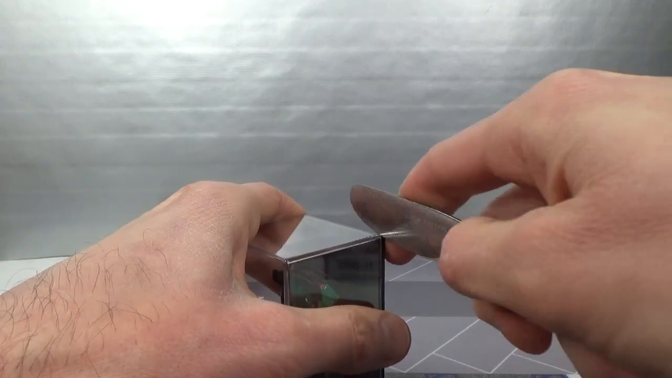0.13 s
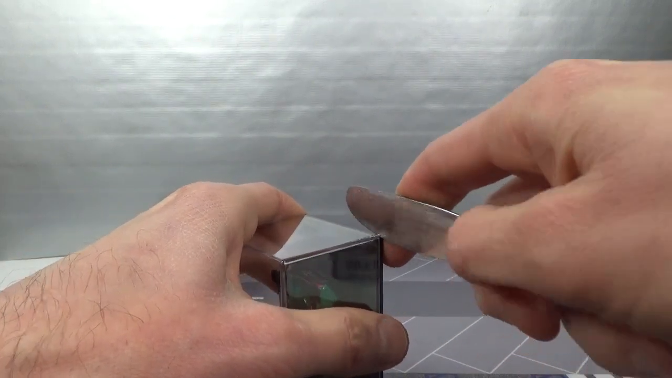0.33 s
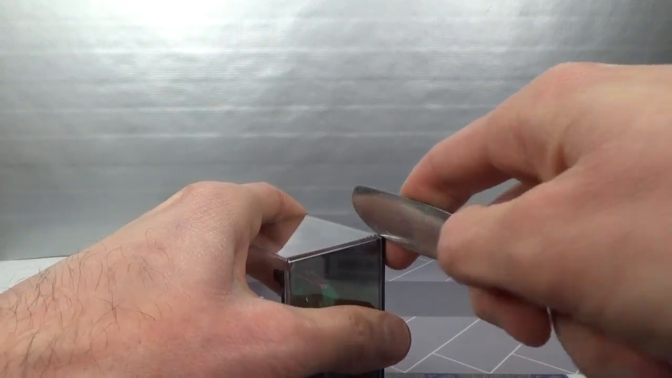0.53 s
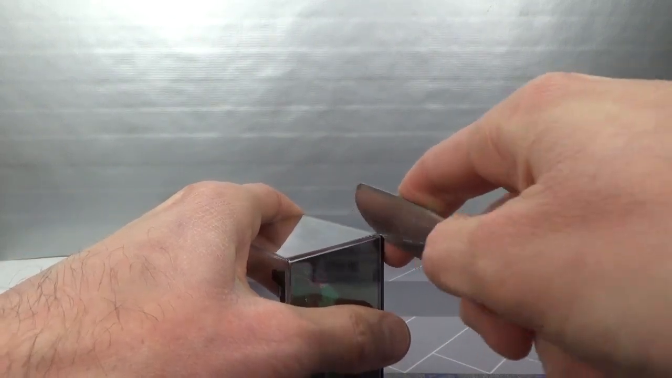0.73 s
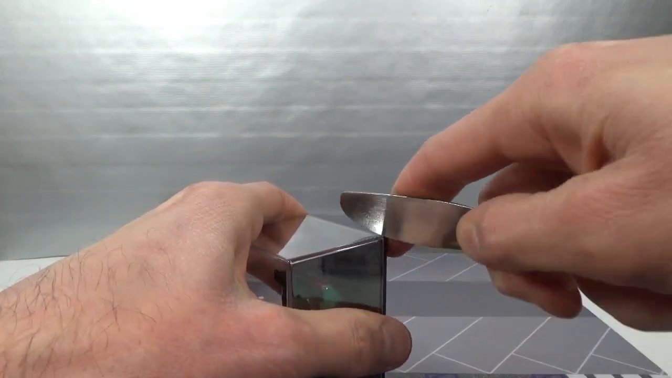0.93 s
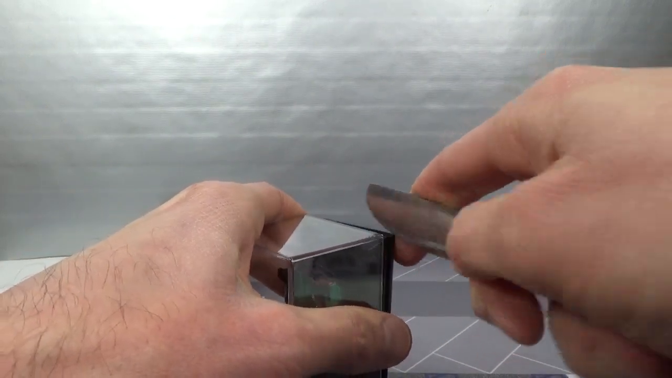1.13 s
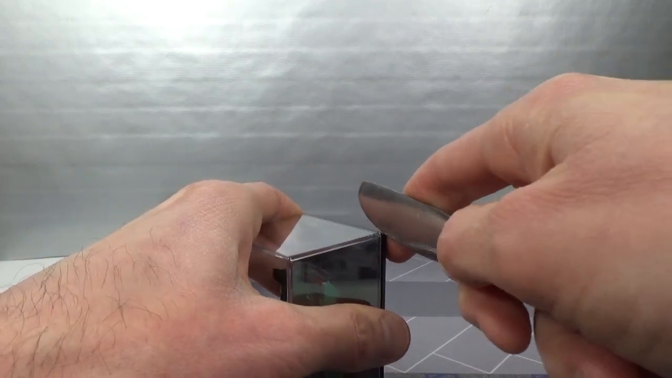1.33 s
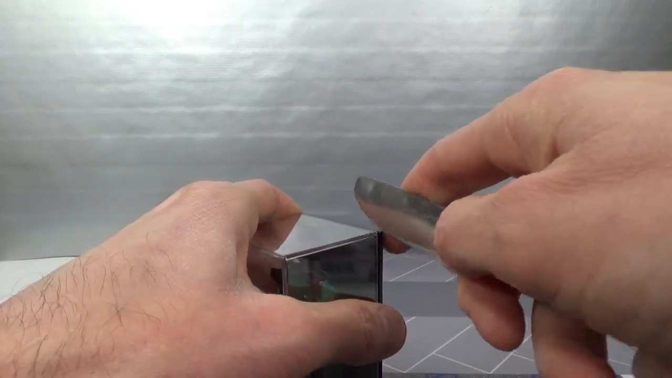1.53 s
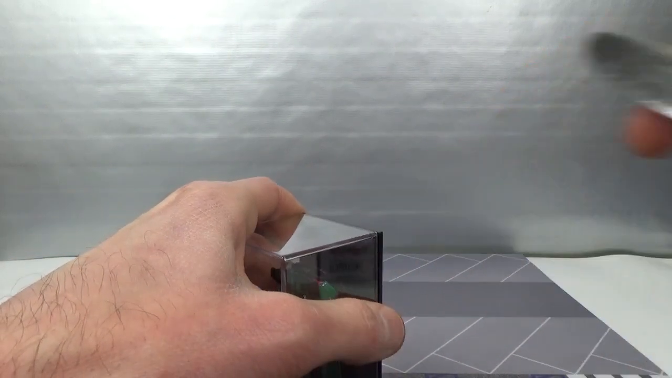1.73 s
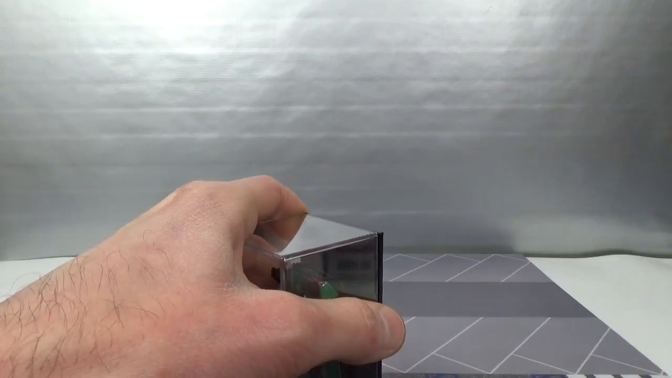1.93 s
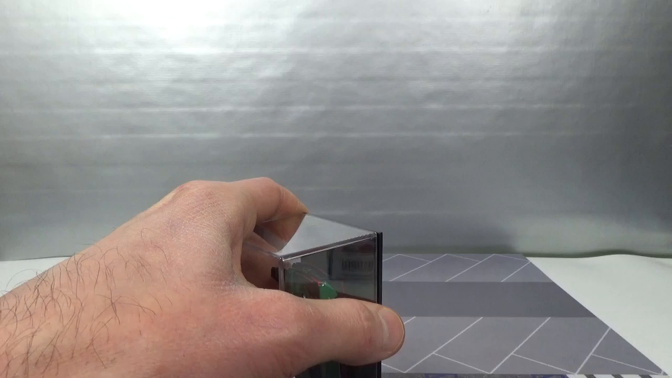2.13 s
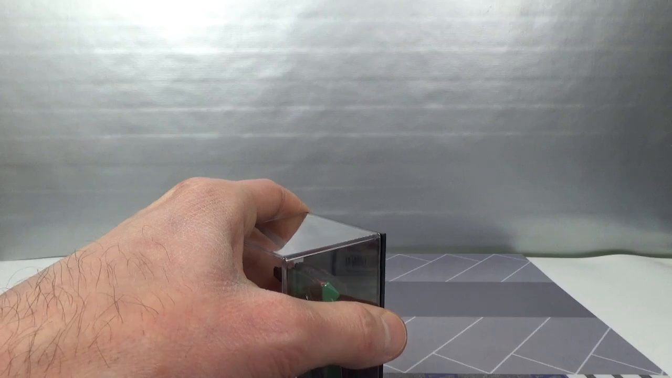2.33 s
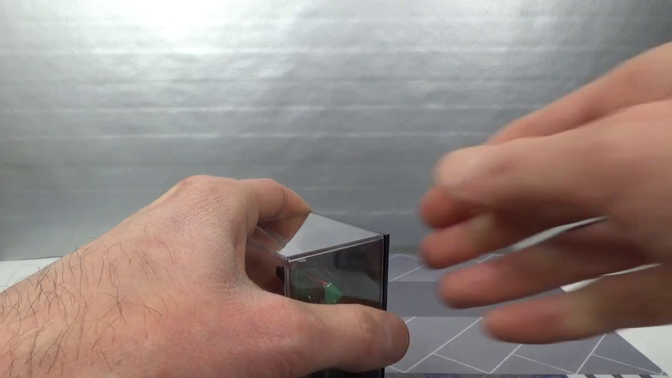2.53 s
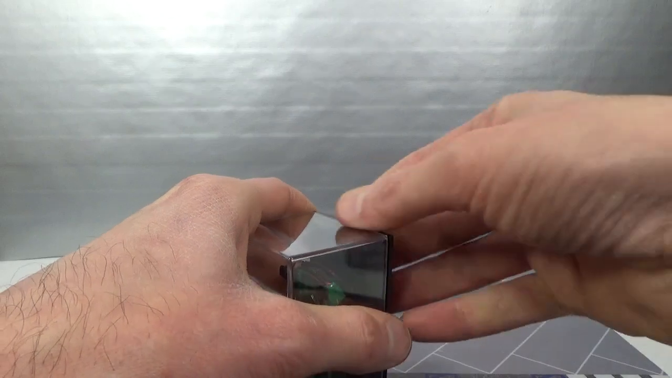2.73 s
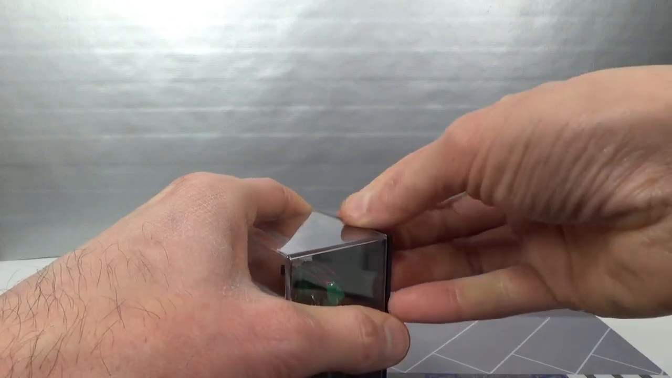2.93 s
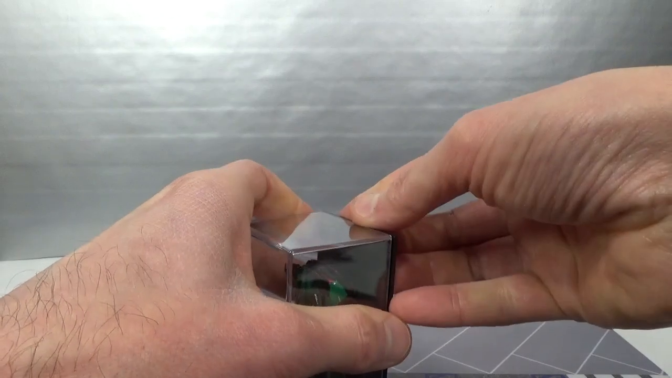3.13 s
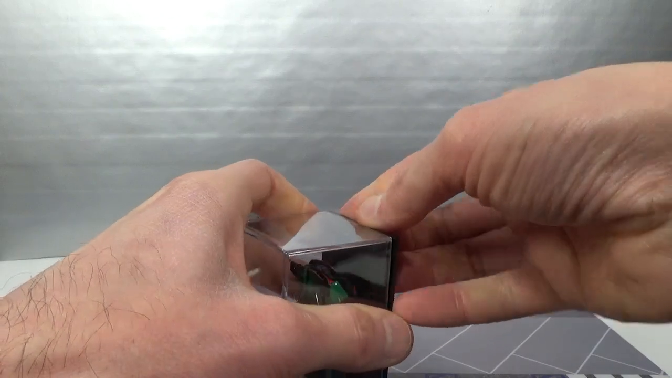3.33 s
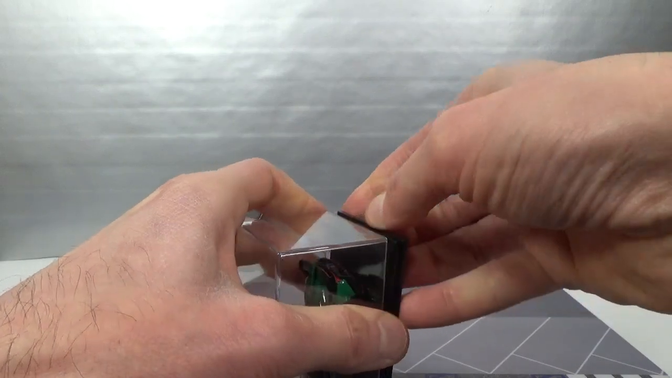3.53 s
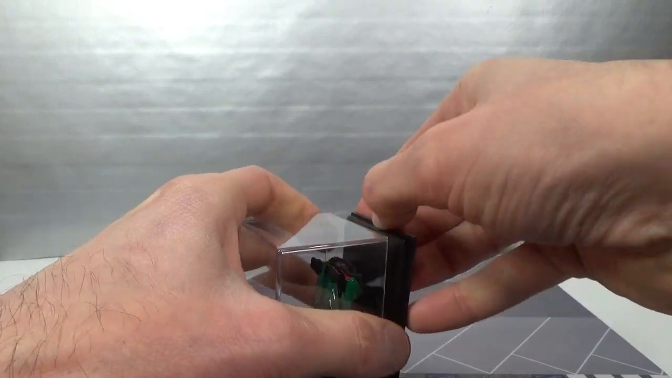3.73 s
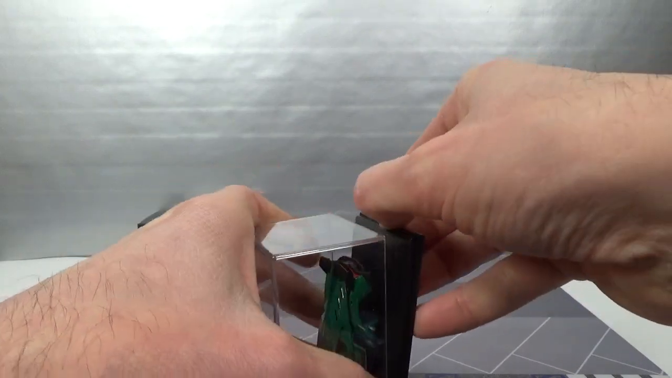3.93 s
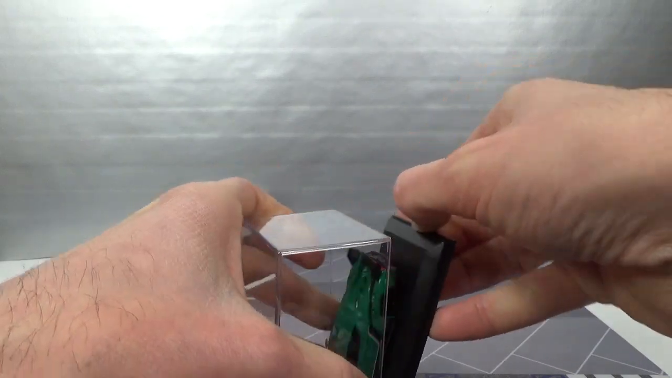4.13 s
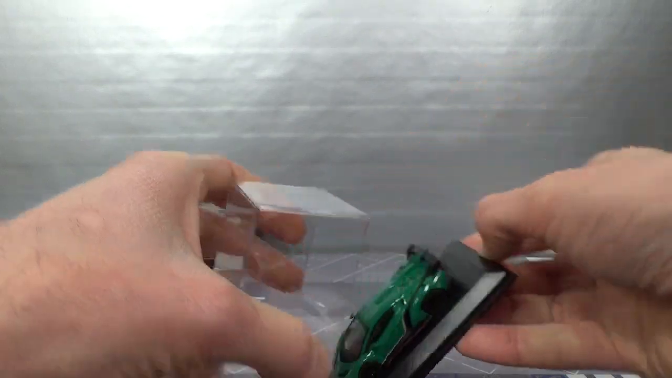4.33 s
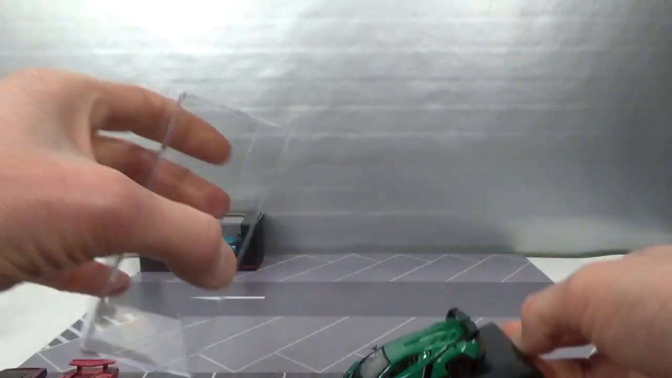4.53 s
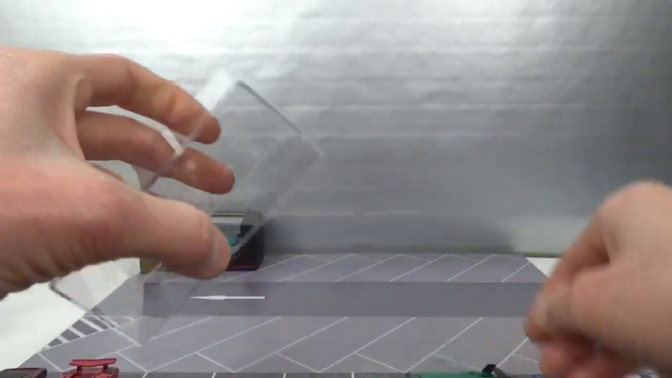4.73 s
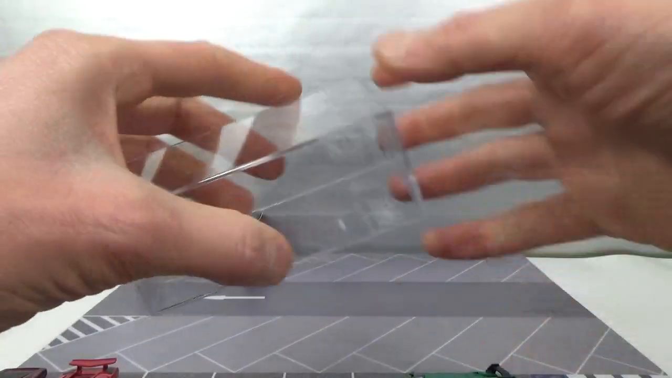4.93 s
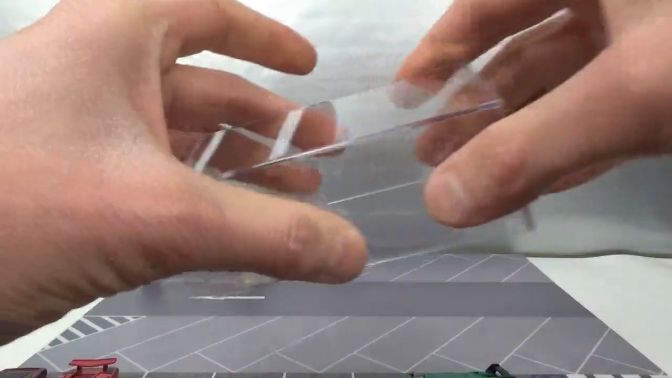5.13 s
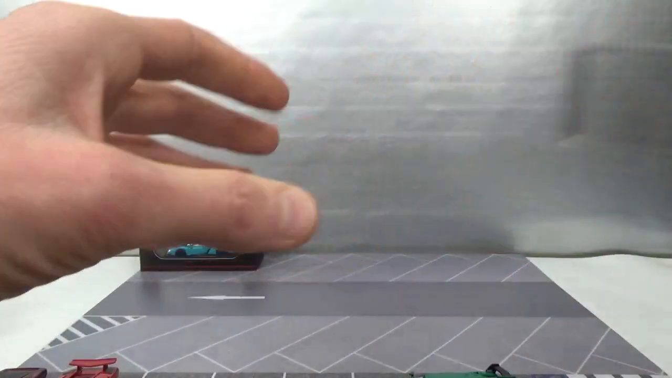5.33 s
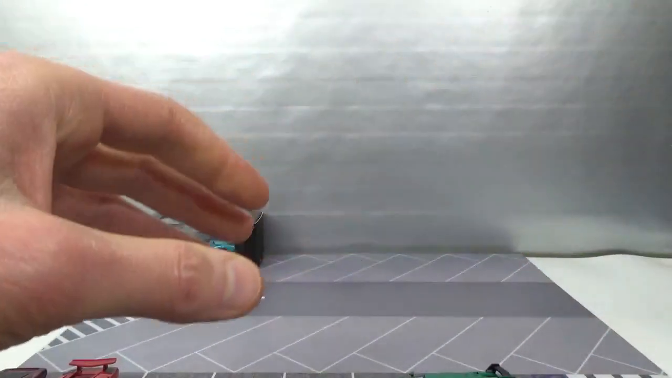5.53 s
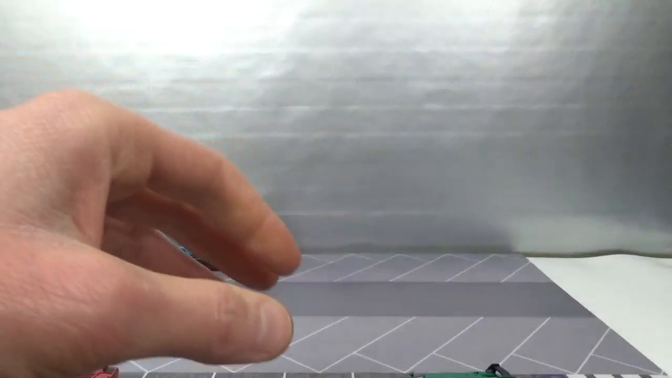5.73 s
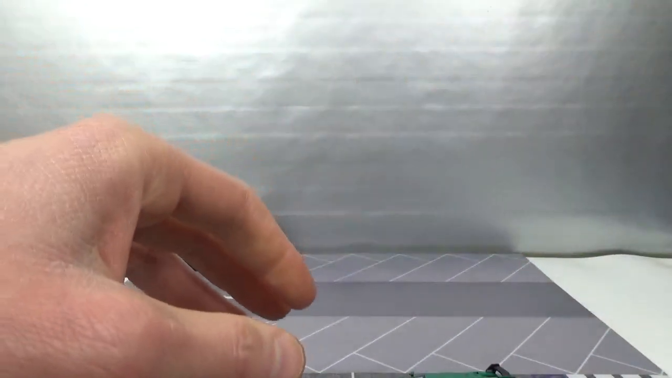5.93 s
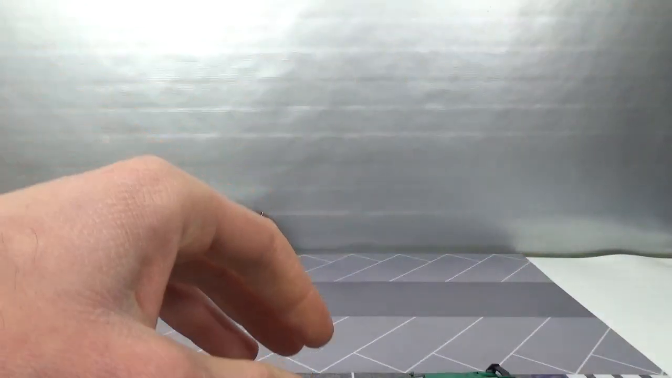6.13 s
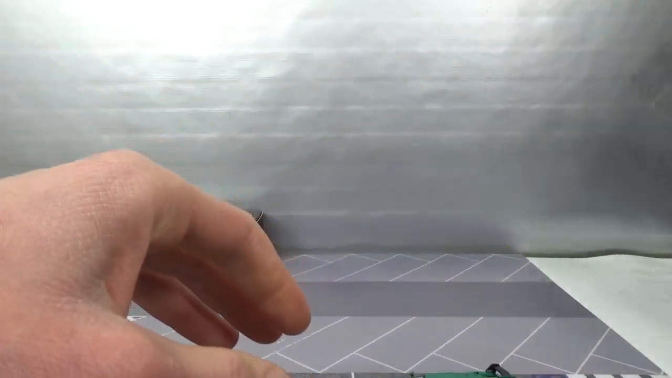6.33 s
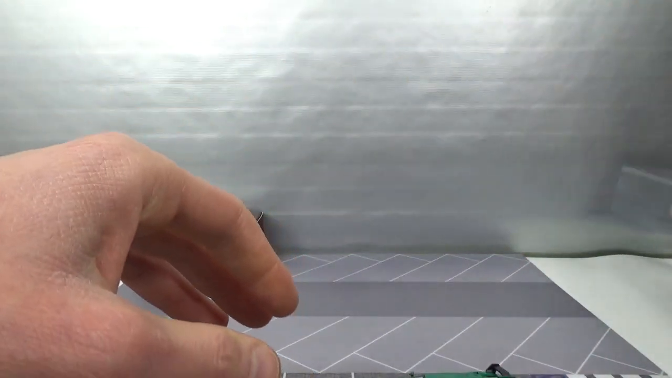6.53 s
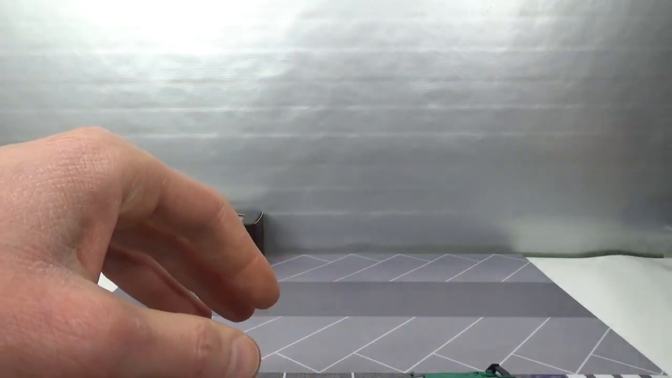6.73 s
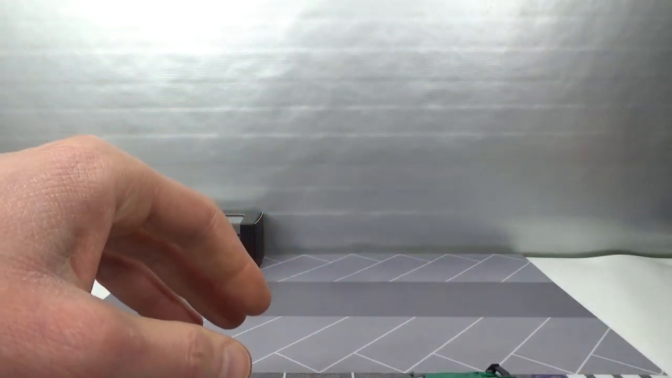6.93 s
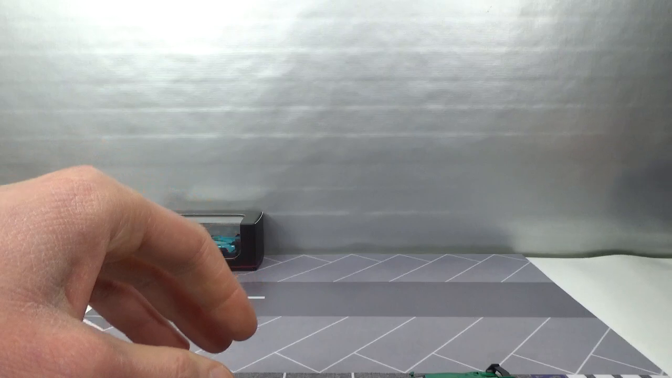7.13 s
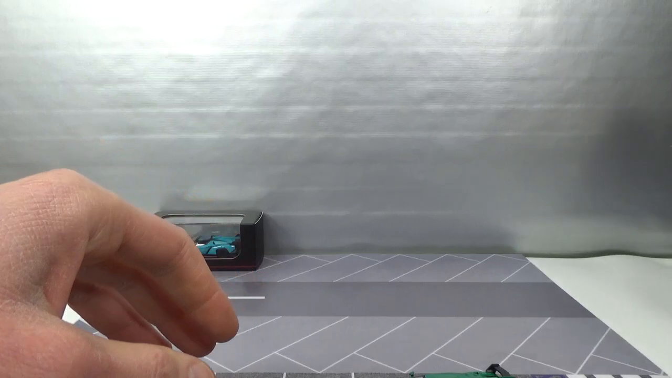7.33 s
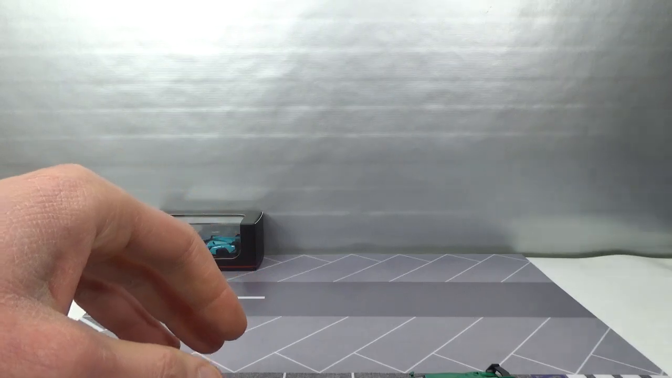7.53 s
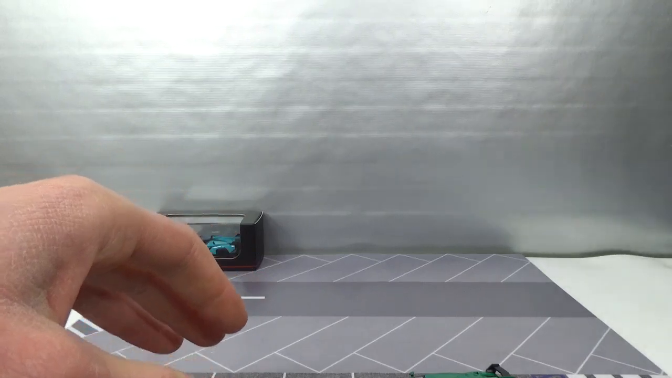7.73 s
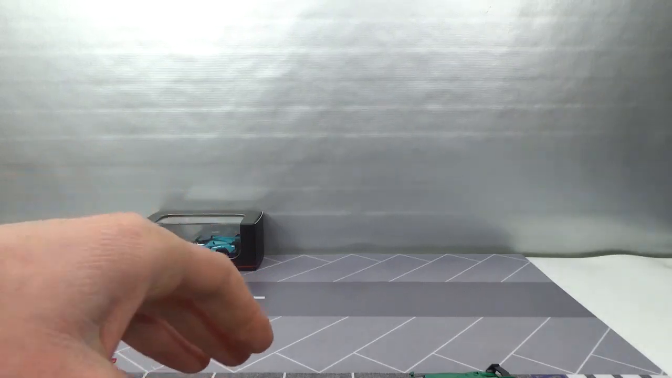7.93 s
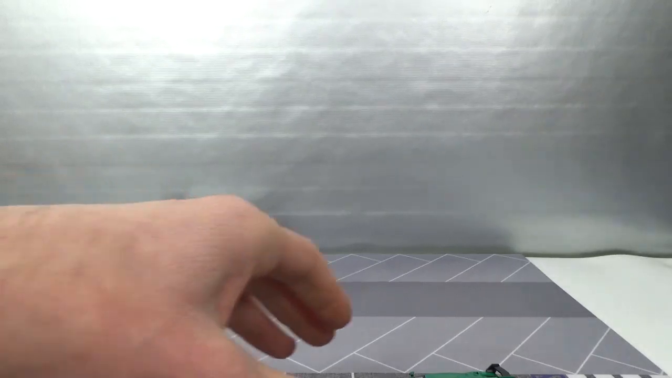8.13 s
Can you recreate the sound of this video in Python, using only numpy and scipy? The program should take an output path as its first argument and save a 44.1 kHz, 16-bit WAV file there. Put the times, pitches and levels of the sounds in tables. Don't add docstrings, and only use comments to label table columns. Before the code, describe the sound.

A knife ticks at a thin plastic case and thumps down, the seam creaks and snaps open, the base clacks on the table, the cover skitters away.

```python
import sys
import numpy as np
from scipy import signal
from scipy.fft import rfft, irfft
from scipy.io import wavfile
from scipy.ndimage import uniform_filter1d

SR = 44100
rng = np.random.default_rng(int(sys.argv[2]) if len(sys.argv) > 2 else 0)


def store_wav(level_fs):
    pcm = np.round(np.clip(np.atleast_2d(level_fs), -1, 1) * 32767)
    wavfile.write(sys.argv[1], SR, pcm.T.astype(np.int16))


def field_ratio(decibels):
    return 10 ** (np.asarray(decibels, dtype=float) / 20)


N = 360297


def unit(x):
    return x / np.sqrt(np.mean(x ** 2))


def peak(x):
    return x / np.max(np.abs(x))


def ring(hz, t60, seconds=.12):
    t = np.arange(int(seconds * SR)) / SR
    return np.sin(2 * np.pi * np.c_[hz] * t) * np.exp(-np.log(1000) * t / np.c_[t60])


def band(x, lo_hz, hi_hz):
    return signal.sosfilt(signal.butter(2, [lo_hz, hi_hz], "band", fs=SR, output="sos"), x)


def high(x, hz):
    return signal.sosfilt(signal.butter(3, hz, "high", fs=SR, output="sos"), x)


def curve(points):
    f = np.log(np.fft.rfftfreq(N, 1 / SR) + 1)
    hz, value = np.transpose(points)
    return np.interp(f, np.log(hz), value)


def placed(x, pan_db):
    return x * field_ratio(np.array([[pan_db], [-pan_db]]) / 2)


def grit(size, spiky_db):
    return rng.standard_normal(size) * field_ratio(spiky_db * rng.exponential(size=size))


ROOM_T60_S, ROOM_DB, ROOM_SIDE = 0.18, -10, 0.6


def add(out, sound, s):
    t = np.arange(int(.8 * ROOM_T60_S * SR)) / SR
    fade = np.exp(-np.log(1000) * t / ROOM_T60_S) * np.clip(t / 0.0019, 0, 1)
    mid, side = rng.standard_normal((2, len(t))) * fade
    side = side - .35 * np.roll(side, 3)
    echoes = band(np.array([mid + ROOM_SIDE * side, mid - ROOM_SIDE * side]), 420, 9700)
    echoes *= field_ratio(ROOM_DB) / np.sqrt(np.sum(echoes ** 2) / 2)
    echoes[:, 0] = 1
    i = int(s * SR)
    heard = signal.fftconvolve(sound[None], echoes, axes=1)[:, :N - i]
    out[:, i:i + heard.shape[1]] += heard


# (frequency [Hz], lead of the left [rad])
LEFT_LEAD = [(60, .1), (250, .27), (600, .1), (1700, .33), (3000, .15), (8000, .03)]


def ports(x):
    lead = curve(LEFT_LEAD)
    return irfft(rfft(x) * np.exp(.5j * np.array([lead, -lead])), N)


# (frequency [Hz], level [dB per Hz])
AIR = [(15, -48), (25, -11.5), (48, -11), (104, -4), (145, -5.5), (207, -5.5), (619, -10), (907, -8),
       (1550, -15), (2510, -16.5), (9200, -21.5), (11000, -24), (14300, -56), (22000, -120)]
# (frequency [Hz], likeness [0-1])
AIR_ALIKE = [(60, 0.95), (130, 0.8), (270, 0.6), (570, 0.16), (1200, 0.02), (2550, 0.3), (5390, 0.1),
             (11400, 1)]
AIR_DB = -62
HUM_HZ, HUM_DB = 100, -67


def air():
    alike = np.clip(curve(AIR_ALIKE), 0, .99)
    mid, side = rfft(rng.standard_normal((2, N))) * field_ratio(curve(AIR)) * np.sqrt([1 + alike, 1 - alike])
    noise = irfft(np.array([mid + side, mid - side]), N)
    sway = uniform_filter1d(rng.standard_normal((2, N)), size=4000)
    sway = unit(uniform_filter1d(sway, size=4000))
    turn = 2 * np.pi * np.cumsum(HUM_HZ + 1.6 * sway[0]) / SR
    hum = np.sin(turn) * field_ratio(HUM_DB + 2.0 * sway[1])
    hum += np.sin(2.07 * turn) * field_ratio(HUM_DB - 7.5 + 3.8 * sway[0])
    return unit(noise) * field_ratio(AIR_DB) + hum


# (frequency [Hz], level [dB], t60 [s])
TABLE = [(76.3, -13, 0.13), (132, -4, 0.22), (155, 1.5, 0.22), (186, -7, 0.29), (265.3, -2, 0.098),
         (320.8, -5, 0.09), (410, -13, 0.15)]
# (time [s], peak level [dB], push pitch [Hz])
THUMPS = [(0.001, -39, 130), (0.355, -51.5, 209.6), (1.126, -49, 150), (1.497, -40.5, 143),
          (1.548, -38, 152), (2.086, -28.5, 156), (2.277, -38, 220), (2.289, -14, 178), (2.75, -42, 72.7),
          (3.042, -39, 332), (3.158, -47.5, 72.7), (3.5, -37.5, 152), (3.629, -38.5, 110),
          (3.69, -44.5, 72.7), (3.818, -32.5, 119), (3.862, -35.5, 147), (4.516, -21.5, 134.9),
          (4.665, -39.5, 97.4), (4.7786, -16, 150), (5.012, -43.5, 293.6), (5.049, -44.5, 214),
          (5.197, -43, 200), (6.843, -33, 218.5), (6.961, -34, 249.8), (8.008, -44, 90)]


def table():
    out, (hz, db, t60) = np.zeros((2, N)), np.transpose(TABLE)
    modes = ring(hz, t60, seconds=.3)
    soft = np.hanning(int(.003 * SR))
    for s, peak_db, push_hz in THUMPS:
        weights = field_ratio(db + 2.0 * rng.standard_normal(len(hz))) * rng.choice([-1, 1], len(hz))
        thump = field_ratio(-9.5) * peak(weights @ modes)
        thump += peak(ring([1.15 * push_hz], [0.022], seconds=.3)[0])
        add(out, field_ratio(peak_db) * peak(np.convolve(thump, soft)), s + 0.003)
    return out


# (frequency [Hz], level [dB], t60 [s])
BLADE = [(4800, -7.5, 0.18), (6180, -1, 0.056), (8700, 0, 0.11), (9122, -5, 0.26), (9700, -12, .1)]
# (time [s], level [dB], tilt [dB per octave])
BLADE_HITS = [
    (1.72, -67, 8),
    (1.82, -65.5, 12.5),
    (2.172, -71, 14),
    (2.292, -45, -5),
    (2.305, -57, 6.5),
]


def blade():
    out, (hz, db, t60) = np.zeros((2, N)), np.transpose(BLADE)
    modes = ring(hz, t60, seconds=.25)
    for s, hit_db, tilt in BLADE_HITS:
        add(out, field_ratio(hit_db + db + tilt * np.log2(hz / 8800)) @ modes, s)
    return out


# (frequency [Hz], width [Hz], level [dB])
RUB_WALLS = [(683, 120, 4.5), (1070, 73, -3.5), (1880, 200, -8.5), (2550, 150, -9)]


def rubbing(scrapes, rise_share):
    out = np.zeros((2, N))
    hz, width, db = np.transpose(RUB_WALLS)
    walls = ring(hz, 2.0 / width, seconds=.04)
    for s, fall, rumble_db, centre_hz, hiss_db in scrapes:
        rise = min(rise_share * fall, s / 2)
        t = np.arange(-2 * rise, 3 * fall, 1 / SR)
        swell = np.exp(-np.where(t < 0, 2 * (t / rise) ** 2, (1.61 * t / fall) ** 1.7))
        patch = unit(uniform_filter1d(rng.standard_normal(len(t) + 1000)[:len(t)], size=150))
        drag = grit(len(t), 1.7) * field_ratio(1.8 * patch)
        near = field_ratio(db - 10.0 * np.abs(np.log2(hz / centre_hz)))
        rumble = unit(signal.fftconvolve(drag, near @ walls)[:len(t)])
        rumble += 1.28 * unit(band(drag, centre_hz / 2.4, centre_hz * 2.06))
        hiss = unit(band(drag, 2700, 12900))
        add(out, swell * (field_ratio(rumble_db - 6.5) * rumble + field_ratio(hiss_db) * hiss), s + t[0])
    return out


# (loudest time [s], fall [s], rumble level [dB], rumble centre [Hz], hiss level [dB])
DRAG = [
    (6.775, .013, -40, 300, -70),
    (6.82, .03, -42, 350, -60),
    (6.875, .03, -40, 450, -56),
    (6.915, .03, -42, 400, -58),
    (6.953, .025, -44, 600, -65),
    (.012, .04, -53, 3900, -66),
    (3.41, .015, -50, 450, -75),
    (8.1, .03, -61, 200, -80),
    (3.358, .013, -49, 3000, -58),
    (6.835, .02, -40, 2500, -52),
]


def table_drag():
    return high(rubbing(DRAG, .9), 150)


# (loudest time [s], fall [s], rumble level [dB], rumble centre [Hz], hiss level [dB])
SLIDES = [
    (.01, .04, -54, 1350, -68),
    (4.725, 0.039, -42.5, 2600, -67),
    (6.80, .03, -40.5, 3304, -50),
    (6.865, 0.031, -37, 3400, -58),
    (6.945, .025, -41, 3000, -54),
    (6.99, 0.033, -41, 3600, -52),
    (7.0, .06, -39, 414, -59),
]


def slides():
    return rubbing(SLIDES, .9)


# (loudest time [s], fall [s], rumble level [dB], rumble centre [Hz], hiss level [dB])
SKIDS = [(.004, 0.05, -57, 890, -56.5), (1.168, 0.0054, -44, 2500, -54), (2.281, 0.01, -45, 640, -49),
         (2.3, 0.042, -46.5, 600, -48), (3.361, 0.015, -41, 1810, -63), (4.165, 0.11, -56, 1190, -57.5),
         (4.579, 0.19, -46, 1050, -48.5), (4.802, .06, -41, 2400, -38.5), (5.02, 0.024, -45, 2300, -44.5),
         (6.763, 0.03, -30.5, 2300, -42.5), (7.03, 0.067, -34, 2570, -44.5)]
RUBS = [(.37, 0.027, -71.5, 600, -70.5), (1.146, 0.015, -29.5, 1990, -30.5), (2.8, 0.042, -63.5, 1500, -63),
        (2.92, 0.06, -59, 1000, -60), (3.1, 0.046, -49, 600, -57.5), (3.41, 0.011, -51, 1300, -48),
        (3.762, 0.042, -46.5, 1100, -51), (3.81, 0.031, -51, 1500, -49), (4.045, 0.016, -46, 800, -55),
        (4.72, 0.043, -34, 2045, -39), (5.11, 0.042, -51.5, 2010, -53), (5.18, 0.031, -53, 1990, -54),
        (5.431, .031, -58.5, 1200, -58), (6.47, 0.21, -62, 2514, -64.5), (6.81, 0.049, -37.5, 1100, -51),
        (6.899, 0.0623, -38, 2300, -46), (6.98, 0.056, -42.5, 1500, -53), (7.05, 0.064, -41, 610, -53)]
STRAINS = [
    (3.535, 0.022, -39, 990, -46),
    (3.64, 0.017, -38, 704, -50),
    (3.872, 0.024, -26.5, 2100, -31),
    (8.105, 0.025, -64, 2000, -55.5),
]


def edge_friction():
    return high(rubbing(SKIDS, 0.27) + rubbing(RUBS, .9) + rubbing(STRAINS, 1.5), 480)


# (time [s], slip rate [Hz], level [dB])
SQUEAK = [
    (2.876, 323, -51),
    (2.886, 318, -35.5),
    (2.906, 357, -40),
    (2.916, 368, -62),
]


def squeak():
    s, hz, db = np.transpose(SQUEAK)
    t = np.arange(s[0], s[-1], 1 / SR)
    slips = np.diff(np.floor(np.cumsum(np.interp(t, s, hz)) / SR), prepend=0)
    slips = np.convolve(slips, np.hanning(22))[:len(t)]
    modes = ring([340, 660, 1060, 1706], [0.015, 0.0088, 0.018, 0.01], seconds=.04)
    wall = field_ratio(np.array([-10.0, 8.0, 4.0, -3.0])) @ modes
    tone = unit(signal.fftconvolve(slips, wall)[:len(t)])
    out = np.zeros((2, N))
    add(out, tone * field_ratio(np.interp(t, s, db)) * signal.windows.tukey(len(t), .3), s[0])
    return out


# (time [s], peak level [dB], pitch [Hz], t60 [s])
FREE_RINGS = [(0.002, -46, 1300, 0.14), (0.001, -44, 1050, .09), (1.168, -36, 9600, .04),
              (3.043, -33, 427, 0.047), (3.843, -25.5, 1043, 0.077), (4.126, -43, 1094, .05),
              (4.18, -42, 1130, 0.11), (4.182, -43, 2100, 0.11), (4.183, -40, 2335, 0.075),
              (4.54, -44, 1850, 0.15), (5.007, -47.5, 4400, 0.12), (5.02, -52, 1130, .15),
              (5.118, -51, 2140, .08), (5.161, -53, 4020, 0.1), (5.207, -55.5, 1130, 0.24),
              (5.417, -57.5, 1130, 0.17), (5.689, -49, 1130, 0.095), (6.789, -25, 649, 0.07),
              (6.93, -29, 600, 0.12), (6.846, -24, 215, .04), (6.862, -31.5, 260, .04),
              (6.972, -32, 400, 0.06), (7.03, -32, 400, 0.13), (4.806, -29, 150, .16),
              (2.297, -32, 300, .1), (3.885, -32, 460, .08), (3.82, -29, 5100, .05), (4.7, -44, 1870, .15),
              (3.535, -34, 590, .06), (1.494, -33, 668, 0.025), (1.269, -45, 160, .06),
              (3.52, -41.5, 300, .05), (3.866, -22, 2094, .09), (3.861, -24, 7500, .03),
              (3.888, -30, 780, .07), (3.416, -38, 1500, .05), (3.759, -36, 930, .06),
              (3.54, -36, 1400, .04), (3.043, -36, 1100, .03), (8.085, -52, 90, .15),
              (2.089, -42, 420, .04)]


def free_rings():
    out = np.zeros((2, N))
    for s, peak_db, hz, t60 in FREE_RINGS:
        tone = [1, .3] @ ring([hz, 1.03 * hz], [t60, t60], seconds=.2)
        swell = np.minimum(np.arange(len(tone)) / (0.0012 * SR), 1)
        add(out, field_ratio(peak_db) * tone * swell, s)
    return out


PANELS_PER_HARDNESS = 0.43


def contacts(hits, panels, widen, ring_db, panels_db, rattle_ms, cycles=11.5, spot_db=5.5):
    out, t = np.zeros((2, N)), np.arange(2048) / SR
    hz, width, db = np.transpose(panels)
    modes = ring(hz, 2.2 / (widen * width), seconds=.09)
    length = rattle_ms / 1000
    for s, peak_db, wall_hz, crack_db in hits:
        panel_db = panels_db + PANELS_PER_HARDNESS * crack_db
        rattle = grit(len(t), 2.2) * np.exp(-t / length) * np.minimum(t / (.3 * length), 1)
        rattle[int(.2 * length * SR)] += .006 / length
        pair = wall_hz * np.array([1, .8, 1.3])
        wall = signal.fftconvolve(rattle, [1, -.25, -.4] @ ring(pair, cycles / pair, seconds=.09))
        weights = field_ratio(db + spot_db * rng.standard_normal(len(hz))) * rng.choice([-1, 1], len(hz))
        panel = peak(signal.fftconvolve(rattle, weights @ modes))
        sound = peak(wall) + field_ratio(panel_db + ring_db) * panel
        sound[:len(t)] += field_ratio(panel_db + 12.5) * peak(band(rattle, 810, 4300))
        crack = band(rattle, 2700, 14000) + 0.22 * band(rattle, 5800, 13000)
        sound[:len(t)] += field_ratio(crack_db + 16.5) * peak(crack)
        add(out, field_ratio(peak_db - 3.0) * sound, s)
    return out


# (frequency [Hz], width [Hz], level [dB])
BASE = [(2100, 400, -8), (5070, 320, -4), (5790, 75, -8), (7250, 120, -4), (8444, 410, -2),
        (1300, 220, 1.5)]
# (time [s], peak level [dB], wall pitch [Hz], hardness [dB of treble crack])
SHARP_SLIPS = [(1.167, -40, 3900, 6), (1.086, -40, 2400, -3), (2.829, -42, 3300, -14),
               (2.855, -46, 800, -30), (2.883, -48, 3250, -20), (2.922, -48, 1050, -35),
               (3.874, -20, 2300, -14), (4.037, -46, 800, -30), (4.136, -42, 2050, -16),
               (5.102, -48, 1100, -20), (5.117, -38, 1750, -14), (6.885, -27, 3200, -14),
               (6.971, -27, 900, -11), (7.029, -29, 2600, -14), (8.005, -47, 420, -40),
               (3.501, -37, 3700, -10), (3.403, -44, 3800, -14), (1.494, -46, 1300, -8),
               (1.55, -42, 480, -30), (6.763, -32, 3800, -20)]


def sharp_slips():
    return contacts(SHARP_SLIPS, BASE, widen=1.5, ring_db=3.0, panels_db=-6, rattle_ms=1.6, cycles=9)


# (frequency [Hz], width [Hz], level [dB])
OPEN_CASE = [(984, 70, -2.5), (1820, 91, 6.5), (1350, 87, -3.5), (2436, 60, -14.5), (3400, 73, -5.5),
             (4150, 120, -12), (4460, 80, -16), (4750, 130, -11), (6150, 49, -11.5), (7500, 64, -6.5),
             (7700, 70, -11), (9400, 140, -9), (9600, 47, -12)]
# (time [s], peak level [dB], wall pitch [Hz], hardness [dB of treble crack])
SEAM_SLIPS = [(1.078, -44, 1700, -6), (2.826, -40, 1980, -15.5), (2.834, -38, 960, -24),
              (4.163, -44, 1540, -27), (3.509, -35, 1070, -17), (3.541, -31, 1350, -25),
              (3.608, -37, 760, -35), (3.635, -26.5, 633, -42), (3.655, -35, 690, -36),
              (3.681, -37, 690, -35.5), (3.736, -46, 1850, -31), (3.755, -38, 930, -27.5),
              (3.767, -38, 1880, -27), (3.85, -24, 1020, -36.5), (3.902, -23.5, 920, -27),
              (3.917, -39, 792.5, -21), (6.818, -32, 617, -36), (6.941, -36, 610, -38),
              (7.021, -30, 604, -17), (7.035, -27, 2730, -19), (7.076, -31.5, 520, -40)]


def seam_slips():
    return contacts(SEAM_SLIPS, OPEN_CASE, widen=1.9, ring_db=9.0, panels_db=-6, rattle_ms=1.5, cycles=13)


# (frequency [Hz], width [Hz], level [dB])
HELD_CASE = [(1500, 560, 28), (2200, 220, 10.5), (3420, 170, 2), (4440, 320, 0), (6200, 240, -9),
             (8500, 510, 13.5), (9550, 220, -2)]
# (time [s], peak level [dB], wall pitch [Hz], hardness [dB of treble crack])
EDGE_TICKS = [
    (1.069, -42, 1500, 0),
    (1.154, -36.5, 1670, 3),
    (2.025, -54.5, 689, 1),
    (2.29, -28.5, 2100, -5.5),
    (6.364, -55, 4130, 2.5),
]


def edge_ticks():
    return contacts(EDGE_TICKS, HELD_CASE, widen=2.2, ring_db=27.5, panels_db=-29, rattle_ms=1.8)


# (time [s], peak level [dB], wall pitch [Hz], hardness [dB of treble crack])
PRYING = [(0.003, -36, 1200, -30), (.03, -46, 1310, -34), (0.078, -39, 1250, -34), (1.063, -48, 1900, 0),
          (1.084, -38.5, 1370, -11), (1.097, -39.5, 1340, -5), (1.112, -30.5, 1080, -4),
          (1.131, -33.5, 740, -12), (1.139, -28, 714, 2), (1.147, -31, 1950, -2), (1.214, -32, 620, -15),
          (1.241, -29, 630, -18), (1.269, -30, 684, -17.5), (1.293, -41.5, 2300, -27),
          (1.491, -41, 600, -22), (1.546, -39, 520, -40), (1.559, -33, 1150, -35)]


def prying():
    return contacts(PRYING, HELD_CASE, widen=1.7, ring_db=13.5, panels_db=-5.5, rattle_ms=2.25, cycles=5.5)


# (time [s], peak level [dB], wall pitch [Hz], hardness [dB of treble crack])
PULLING = [(2.744, -43, 1187, -9.5), (2.753, -42.5, 1610, -24), (2.768, -43, 1060, -20),
           (2.775, -47, 625, -21), (2.787, -44, 700, -13), (2.823, -34, 464, -15), (2.83, -31, 790, -30),
           (2.854, -51, 622, -33), (3.042, -29.5, 1000, -24), (3.264, -53.5, 516, -1.5),
           (3.35, -43.5, 980, -11), (3.401, -36.5, 1020, -12), (3.416, -33, 1470, -23),
           (3.468, -46, 500, -17), (3.501, -29.5, 1070, -6), (3.52, -33, 478, -20), (3.537, -31, 606, -19),
           (3.594, -40.5, 1070, -10), (3.616, -38, 730, -8), (3.625, -25, 650, -35),
           (3.645, -29.5, 680, -41), (3.676, -43, 696, -19), (3.687, -34, 640, -38),
           (3.728, -41.5, 1880, -12), (3.76, -36, 930, -18), (3.773, -39, 682, -25)]


def pulling():
    return contacts(PULLING, OPEN_CASE, widen=1.7, ring_db=11.0, panels_db=-6.5, rattle_ms=2.2)


# (frequency [Hz], width [Hz], level [dB])
COVER = [(1130, 45, -3), (1500, 60, 4), (2130, 27, -2.5), (2300, 60, -2), (2510, 103, 4.5), (3500, 39, -15),
         (4400, 60, -3), (8870, 86, -13)]
# (time [s], peak level [dB], wall pitch [Hz], hardness [dB of treble crack])
COVER_FREED = [
    (4.043, -35.5, 1930, -7.5),
    (4.123, -42, 1090, -16),
    (4.135, -41.5, 1150, -10.5),
    (4.149, -25.5, 1300, -30),
    (4.18, -22, 1130, -18),
    (4.272, -50, 1070, -20),
]


def cover_freed():
    return contacts(COVER_FREED, COVER, widen=1.0, ring_db=2.5, panels_db=-5, rattle_ms=1.49, cycles=4.7)


# (time [s], peak level [dB], wall pitch [Hz], hardness [dB of treble crack])
COVER_TAPS = [(4.945, -42, 2420, -7.5), (5.007, -52, 2510, -3), (5.054, -50.5, 1570, -1),
              (5.093, -45, 2660, -8), (5.115, -34, 2460, -28), (5.159, -36, 2300, -9.5),
              (5.181, -44, 2200, -7), (5.202, -42, 337, -8.5), (5.414, -51, 1130, -11),
              (5.651, -49.5, 2130, -14), (5.687, -43, 2130, -26.5), (6.059, -53, 1130, -14)]


def cover_taps():
    return contacts(COVER_TAPS, COVER, widen=1.3, ring_db=8.5, panels_db=-5, rattle_ms=3.7)


# (frequency [Hz], width [Hz], level [dB])
COVER_FAR = [(1470, 91, 6), (1970, 77, -6), (2570, 72, -5), (3060, 200, 5), (3770, 140, -5),
             (5920, 73, -16), (8950, 89, -8)]
# (time [s], peak level [dB], wall pitch [Hz], hardness [dB of treble crack])
SKIPPING = [(6.754, -30.5, 520, -28), (6.76, -29, 535, -10.5), (6.787, -26, 650, -30),
            (6.81, -28.5, 640, -40), (6.843, -29, 640, -7), (6.886, -27, 1087, -26), (6.893, -27, 760, -27),
            (6.927, -25, 646, -18), (6.971, -26, 600, -18), (7.029, -23, 620, -20), (7.049, -29, 600, -18),
            (7.278, -56.5, 492, -20)]


def skipping():
    return contacts(SKIPPING, COVER_FAR, widen=1.4, ring_db=12.0, panels_db=-2.5, rattle_ms=2.06, cycles=15)


# (frequency [Hz], width [Hz], level [dB])
FLEXED_CASE = [(929, 60, -6.5), (1540, 60, -4), (2091, 35, -2.5), (2470, 50, -5.5), (3240, 120, -7),
               (4030, 70, -10), (4390, 77, -7), (4890, 72, -6), (6070, 120, -12), (7420, 160, -2.5),
               (7810, 90, -9.5), (9200, 190, -10), (9990, 55, -10.5)]
# (time [s], peak level [dB], wall pitch [Hz], hardness [dB of treble crack])
SNAP = [
    (3.82, -23, 1002, -8),
    (3.825, -22.5, 1830, -17.5),
    (3.835, -29, 1085, -14),
    (3.844, -25, 1050, -26),
    (3.859, -11, 990, -8.5),
    (3.863, -12.5, 2100, -7.5),
    (3.868, -18.5, 1580, -17.5),
    (3.875, -14.5, 2100, -19),
    (3.887, -22, 2100, -18),
]


def snap():
    return contacts(SNAP, FLEXED_CASE, widen=1.05, ring_db=12.5, panels_db=-5.5, rattle_ms=2.9,
                    cycles=7.5, spot_db=1.9)


# (time [s], peak level [dB], wall pitch [Hz], hardness [dB of treble crack])
BASE_DOWN = [
    (4.517, -18.5, 775, -9.5),
    (4.539, -27.5, 790, -8.5),
    (4.553, -35, 764, -6),
    (4.669, -38, 1130, -11.5),
    (4.78, -8, 660, -19),
    (4.807, -22.5, 706, -29),
]


def base_down():
    return contacts(BASE_DOWN, BASE, widen=2.1, ring_db=9.0, panels_db=-1.5, rattle_ms=1.24, cycles=7.3)


def scene():
    heavy = high(placed(table(), -1.0), 60)
    heavy += placed(table_drag(), -2.5)
    heavy += placed(free_rings(), -1.5)
    light = placed(edge_friction(), -1.4)
    light += placed(sharp_slips(), -1.5)
    light += placed(seam_slips() + slides(), -1.8)
    light += placed(edge_ticks(), -0.94)
    light += placed(prying() + squeak(), -0.49)
    light += placed(pulling(), -.7)
    light += placed(cover_freed(), -1.1)
    light += placed(cover_taps(), 0.35)
    light += placed(skipping() + blade(), -5.5)
    light += placed(snap(), -1.1)
    light += placed(base_down(), -1.4)
    return ports(high(light, 300) + heavy) + air()


def roll_off(x):
    return signal.sosfilt(signal.butter(12, 12010, fs=SR, output="sos"), x)


def record(dry):
    top_hz = 10846
    mix = signal.sosfilt(signal.ellip(10, .2, 75, top_hz, fs=SR, output="sos"), dry)
    return roll_off(mix)


dry = scene()
out = record(dry)
store_wav(out)
```